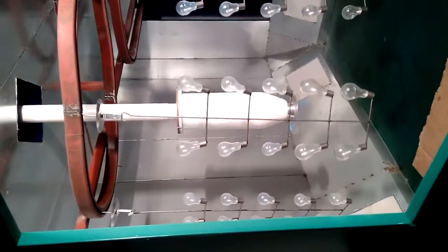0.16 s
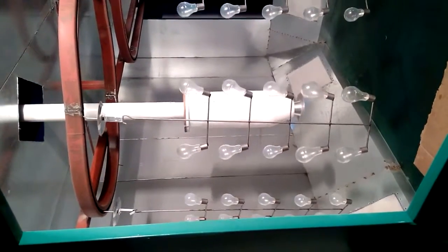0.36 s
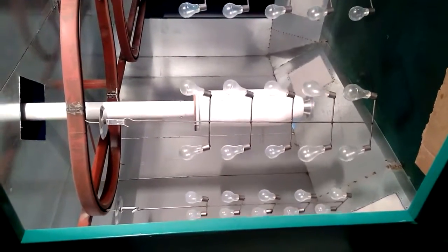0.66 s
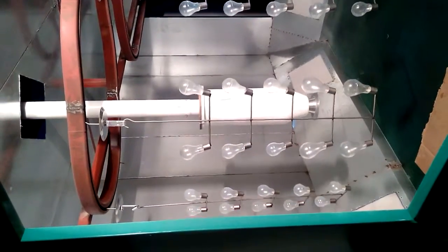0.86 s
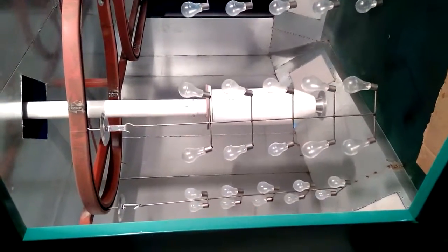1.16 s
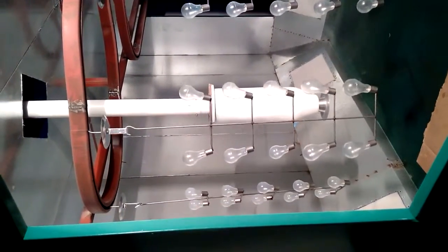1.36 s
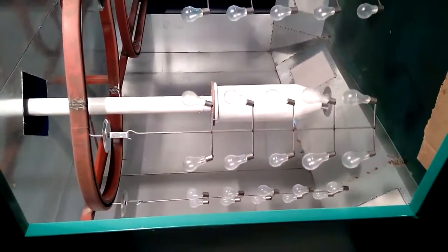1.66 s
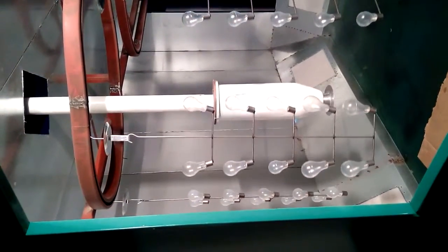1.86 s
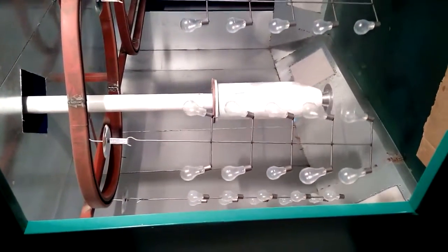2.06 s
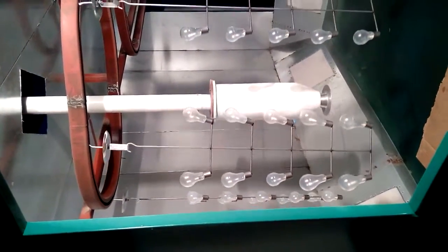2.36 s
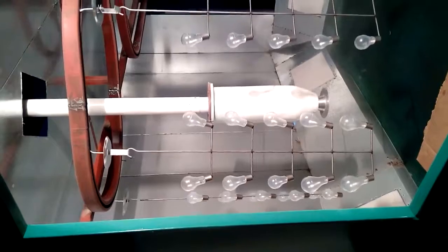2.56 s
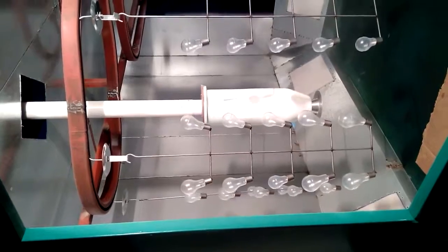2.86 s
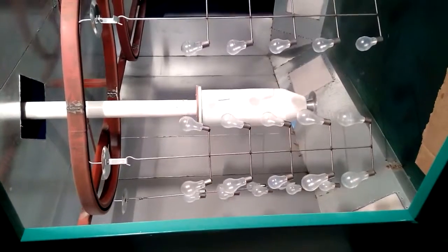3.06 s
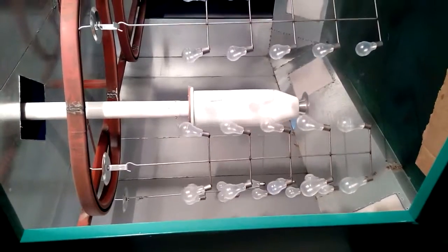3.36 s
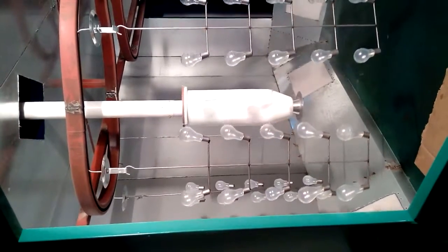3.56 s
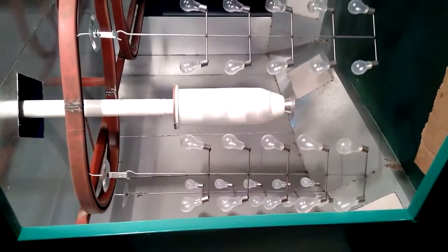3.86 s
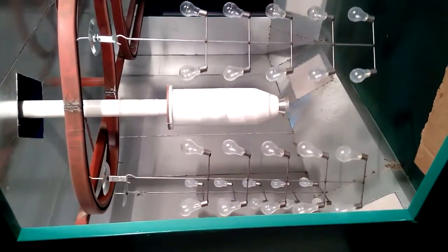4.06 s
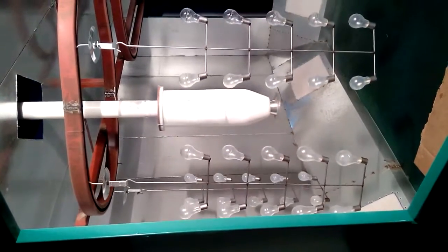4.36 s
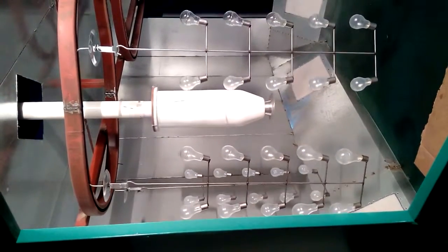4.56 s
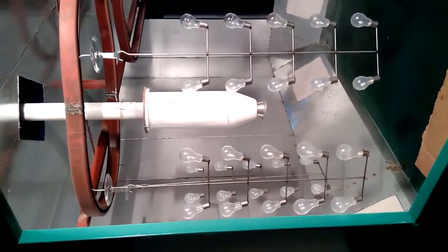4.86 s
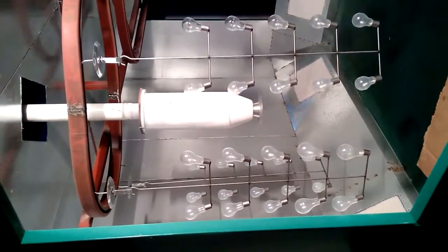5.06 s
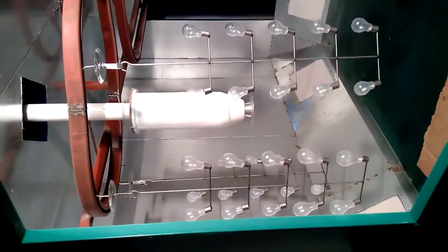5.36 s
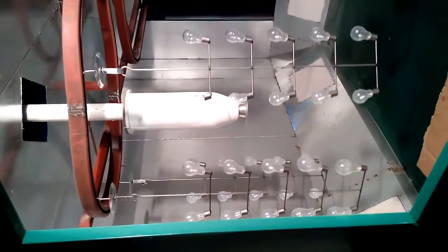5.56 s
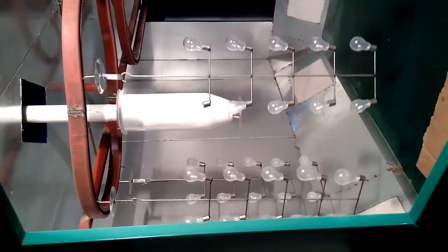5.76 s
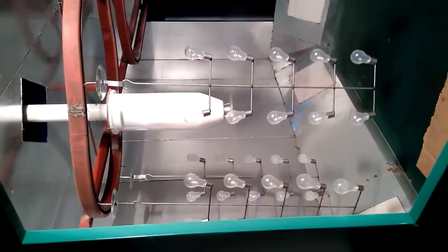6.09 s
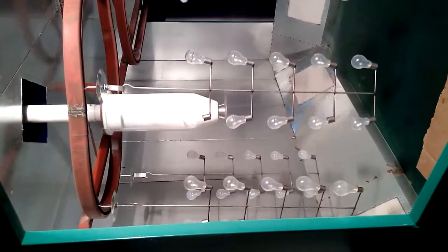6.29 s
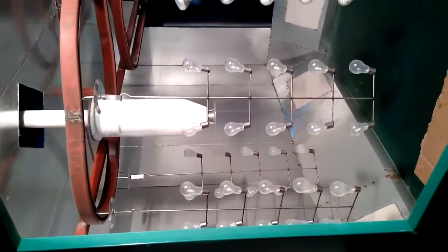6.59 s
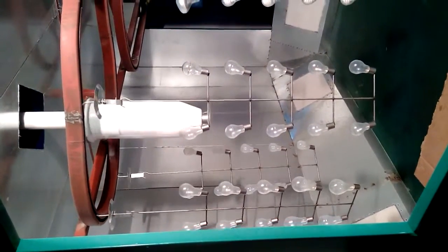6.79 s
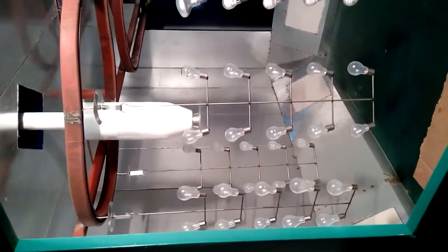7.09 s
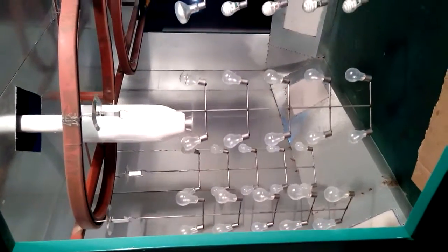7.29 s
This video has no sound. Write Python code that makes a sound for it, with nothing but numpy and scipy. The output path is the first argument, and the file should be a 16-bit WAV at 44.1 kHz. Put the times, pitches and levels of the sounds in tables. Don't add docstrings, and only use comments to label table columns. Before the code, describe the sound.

Machine noise is at full strength from beginning to end: a broad, hissing air jet, low-mid ventilation rumble, and a shrill multi-tone whine from a fast spinning turbine. A fixed extraction-fan hum and a thin tone near two kilohertz sit inside it. Reflections from metal walls make individual whine tones dip and return as the device travels. Very slight swell near three seconds, no impacts or stops. Dense mono sound with muffled upper treble.

```python
import sys
import numpy as np
from scipy import signal
from scipy.fft import rfft, irfft, next_fast_len
from scipy.io import wavfile

SR = 44100
rng = np.random.default_rng(int(sys.argv[2]) if len(sys.argv) > 2 else 0)


def wrap_up_sound(samples):
    columns = np.atleast_2d(samples).T
    tamed = np.clip(columns, -1, 1)
    steps = np.round(tamed * 32767).astype(np.int16)
    wavfile.write(sys.argv[1], SR, steps)


def boost_factor(decibels):
    exponent = np.asarray(decibels, float) / 20
    return 10 ** exponent


N = 327663


def rms_one(x):
    return x / np.sqrt(np.mean(x ** 2) + 1e-20)


def in_time(rows):
    s, *columns = np.transpose(rows)
    return [np.interp(np.arange(N) / SR, s, column) for column in columns]


def shaped(x, points):
    size = next_fast_len(N)
    hz, db = np.transpose(points)
    bin_hz = np.arange(size // 2 + 1) * SR / size
    gain = boost_factor(np.interp(np.log(bin_hz + 1), np.log(hz), db))
    return irfft(rfft(x, size) * gain, size)[:N]


def drift(rate_hz):
    r = np.exp(-200 * np.pi * rate_hz / SR)
    noise = rng.standard_normal(N // 100 + 1002)
    slow = signal.lfilter([1], [1, -2 * r, r * r], noise)[1000:]
    return np.interp(np.arange(N) / 100, np.arange(len(slow)), rms_one(slow))


def peak(x, hz, width_hz, db):
    r = np.exp(-np.pi * width_hz / SR)
    zeros = np.array([1, 0, -1]) * (1 - r * r) / 2
    poles = [1, -2 * r * np.cos(2 * np.pi * hz / SR), r * r]
    return x + (boost_factor(db) - 1) * signal.lfilter(zeros, poles, x)


def patchy(x, own_db, shared_db):
    size = next_fast_len(N)
    spectrum = rfft(x, size)
    hz = np.linspace(1, SR / 2, size // 2 + 1)
    octaves = np.log2(np.clip(hz, 32, 16384))
    out, together = 0, drift(1.0)
    for octave in range(5, 15):
        share = np.clip(1 - abs(octaves - octave), 0, 1)
        band = irfft(spectrum * share, size)[:N]
        out = out + band * boost_factor(shared_db * together + own_db * drift(14.0))
    return out


def lines(turns, multiples, fixed_fades, fade_db, fade_rate_hz, flicker_db):
    out = 0
    for multiple, db in multiples:
        k = round(multiple)
        fade = fade_db * drift(fade_rate_hz) + flicker_db * drift(3.0)
        start = rng.random()
        envelope = rms_one(boost_factor(fixed_fades.get(k, fade)))
        out = out + boost_factor(db) * envelope * np.sqrt(2) * np.sin(2 * np.pi * (k * turns + start))
    return out


def air():
    # (time [s], level [dB])
    air_flow = [
        (0.0, -14),
        (0.54, -14),
        (1.2, -14),
        (2.77, -14),
        (3.06, -13),
        (3.6, -14),
        (4.2, -13.5),
        (5.2, -13.5),
        (7.43, -14),
    ]
    # (frequency [Hz], density [dB per Hz])
    rumble_spectrum = [(25, -46), (40, -38.5), (65, -23), (105, -5.5), (170, -3), (270, 0), (380, 0.5),
                       (470, -4.5), (640, -5), (800, -2), (1100, -9), (1600, -13), (2500, -37)]
    jet_spectrum = [(500, -30.5), (900, -15.5), (1300, -8), (1800, -6), (2200, -6.5), (2700, -11),
                    (3200, -16), (3700, -13), (4200, -9.5), (4800, -7.5), (5300, -7), (5600, -14.5),
                    (6200, -14.5), (7500, -17)]
    # (frequency [Hz], width [Hz], lift over the jet [dB])
    port_cavities = [(2235, 100, 3), (2353, 187, 5.5), (2460, 60, 2), (4554, 77, 2), (4650, 250, 5),
                     (4944, 200, 4.5), (6150, 59, -2.5)]
    # (frequency [Hz], width [Hz], lift [dB])
    edge_whistles = [(1982, 30, 5), (2360, 30, 4), (3168, 18, 9), (3525, 30, 3), (3698, 22, 6),
                     (3825, 20, 4), (4050, 40, 3)]
    # (frequency [Hz], width [Hz], lift [dB])
    duct_modes = [(67, 6, 8), (123.8, 6.2, 5), (196, 4.6, 3.5), (260, 16, 2), (518, 5, 4), (1350, 6.1, 1.5)]

    jet_db, = in_time(air_flow)
    swell_db = 1.1 * (jet_db - jet_db.mean())
    rumble_db = -27.5 + 0.4 * drift(1.5)

    jet = shaped(rng.standard_normal(N), jet_spectrum)
    for hz, width_hz, db in [*port_cavities, *edge_whistles]:
        jet = peak(jet, hz, width_hz, db)
    jet = peak(jet, 2200, 900, swell_db)

    rumble = shaped(rng.standard_normal(N), rumble_spectrum)
    for hz, width_hz, db in duct_modes:
        rumble = peak(rumble, hz, width_hz, db)
        jet = peak(jet, hz, width_hz, db)

    flow_noise = boost_factor(rumble_db) * rms_one(rumble) + boost_factor(jet_db - 1.3) * rms_one(jet)
    return patchy(flow_noise, own_db=0.42, shared_db=-0.14)


def standing_waves():
    # (multiple of the shaft speed, level re direct sound [dB],
    # extra path at the turn [wavelengths], its change [wavelengths per s of travel])
    wall_echoes = [(19, -2.7, 0.54, 0.719), (19, -8.9, 0.58, 2.899), (19, -8.2, 0.3, -0.809),
                   (19, -7.4, 0.65, -2.377), (22, -1.4, 0.39, 0.246), (22, -5.4, 0.97, -0.553),
                   (22, -7.1, 0.33, -1.057), (22, -10.5, 0.31, -1.75), (23, -2.1, 0.46, 0.414),
                   (23, -4.9, 0.31, -0.9), (23, -6.0, 0.65, -0.222), (23, -8.0, 0.12, -1.272),
                   (26, -0.0, 0.59, -0.026), (26, -14.2, 0.51, 1.947), (26, -14.4, 0.44, -1.311),
                   (26, -13.0, 0.77, 2.496), (26, -12.1, 0.18, -0.764)]
    turn_s, notch_fill = 2.57, 0.12

    s = np.arange(0, N / SR + 0.01, 0.01)
    sums = {}
    for multiple, db, path, change in wall_echoes:
        k = round(multiple)
        wavelengths = path + change * abs(s - turn_s)
        sums[k] = sums.get(k, 1) + boost_factor(db) * np.exp(2j * np.pi * wavelengths)

    fades = {}
    for k, total in sums.items():
        level_db = 10 * np.log10(abs(total) ** 2 + notch_fill ** 2)
        fades[k] = np.interp(np.arange(N) / SR, s, level_db)
    return fades


def turbine():
    # (time [s], speed [turns per s])
    shaft_speed = [(0.0, 204.63), (0.5, 204.58), (1.4, 204.3), (2.1, 204.45), (2.6, 204.28), (3.5, 204.68),
                   (4.0, 204.6), (4.5, 204.43), (5.0, 204.37), (5.8, 204.6), (6.3, 204.46), (7.0, 204.88),
                   (7.43, 204.88)]
    # (multiple of the shaft speed, level [dB rms])
    turbine_lines = [(8, -50.4), (9, -55.8), (10, -56.6), (11, -39.9), (12, -37.2), (13, -49.9),
                     (14, -46.8), (15, -55.3), (16, -47.0), (17, -46.7), (18, -48.4), (19, -36.3),
                     (20, -43.4), (21, -40.2), (22, -33.8), (23, -31.0), (24, -49.6), (25, -37.5),
                     (26, -30.5), (27, -51.1), (28, -45.1), (29, -43.9), (30, -47.8), (31, -44.3),
                     (32, -54.7), (33, -49.1), (34, -53.2), (35, -42.5), (36, -48.6)]

    flutter = 0.0019 * drift(4.0)
    turns = np.cumsum(in_time(shaft_speed)[0]) / SR + flutter
    return lines(turns, turbine_lines, standing_waves(), fade_db=4.5, fade_rate_hz=0.8, flicker_db=2.5)


def fan_tones():
    # (multiple of the fan speed, level [dB rms])
    fan_lines = [(5, -60.6), (7, -53.8), (11, -46.3), (12, -45.6), (16, -47.7), (17, -44.7), (18, -47.9),
                 (23, -45.6), (33, -53.0), (34, -48.0), (37, -46.7), (41, -50.7), (42, -51.6), (47, -50.4),
                 (52, -44.8), (53, -49.7), (56, -47.3), (58, -50.0), (61, -48.6), (74, -48.0), (80, -47.6),
                 (97, -46.6), (107, -45.6), (118, -35.9), (120, -37.3), (122, -31.1), (123, -35.2),
                 (124, -41.1), (127, -43.9), (130, -43.6)]
    slot_lines = [122, 123]
    # (time [s], lower tone [dB], upper tone [dB])
    slot_drift = [(0.0, -0.5, 1), (0.6, -2.5, -6.5), (1.3, -1.5, 2.5), (2.4, 1.5, -1), (3.4, -0.5, -3.5),
                  (4.2, 2, 1.5), (5.3, 0.5, -10.5), (5.9, -6, 1), (6.5, -2, 5), (7.0, 4, 4), (7.43, 4, 0)]

    turns = 14.881 * np.arange(N) / SR
    slot_fades = dict(zip(slot_lines, in_time(slot_drift)))
    return lines(turns, fan_lines, slot_fades, fade_db=2.5, fade_rate_hz=0.34, flicker_db=-0.5)


def scene():
    return (air() + turbine() + fan_tones())[None]


def top_cut(x):
    return signal.sosfilt(signal.butter(12, 9250, fs=SR, output="sos"), x)


def record(dry):
    # (frequency [Hz], level [dB])
    bass_cut = [(20, -26.5), (32, -21), (50, -1.5), (70, -0.5)]
    treble_cut = [(6500, 0), (6950, -5), (7150, -12), (7350, -23), (7500, -36), (7600, -45), (7800, -70),
                  (8000, -110)]
    # (frequency [Hz], level [dB])
    image_response = [(8400, -18), (8600, -21.5), (8850, -32.5), (9100, -44.5), (9300, -57.5), (9700, -120)]

    soft = 1.384 * np.tanh(dry[0] / 1.217)
    x = shaped(soft, [*bass_cut, *treble_cut])
    carrier = np.cos(2 * np.pi * 16000 * np.arange(N) / SR)
    mirror = shaped(2 * x * carrier, image_response)
    return top_cut((x + boost_factor(1) * mirror)[None])


dry = scene()
out = record(dry)
wrap_up_sound(out)
```